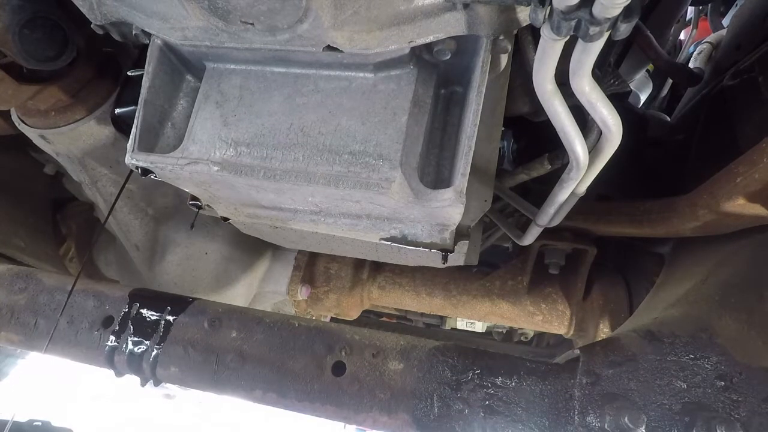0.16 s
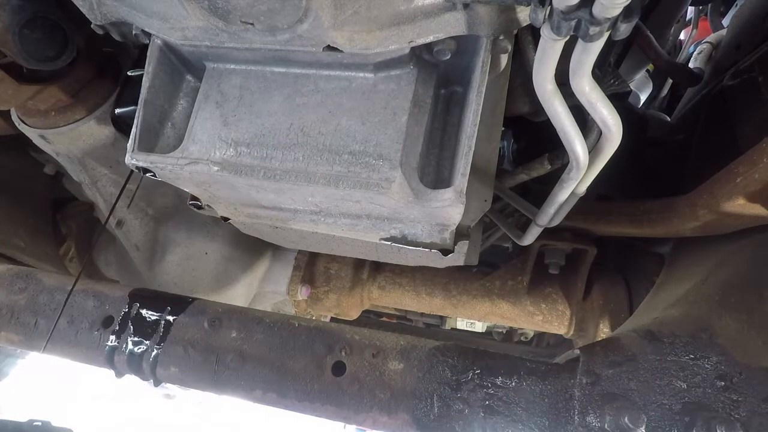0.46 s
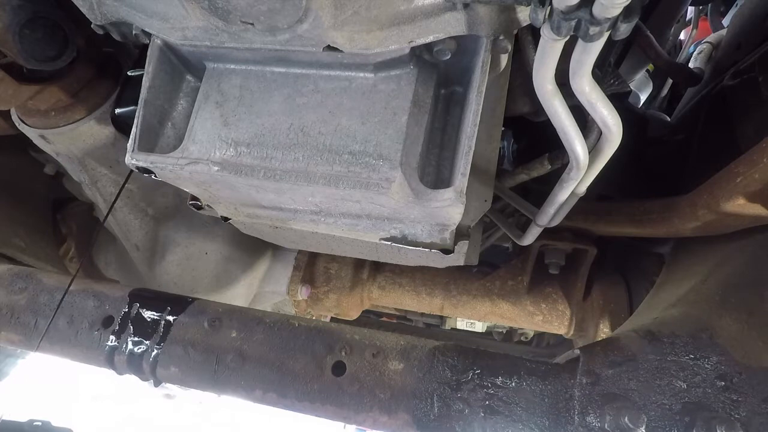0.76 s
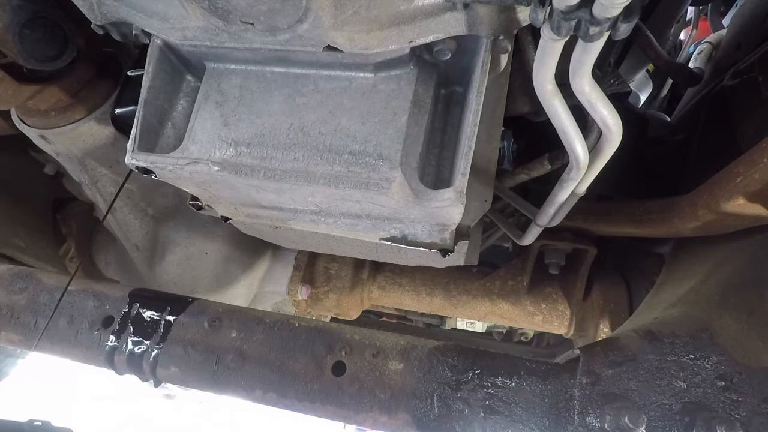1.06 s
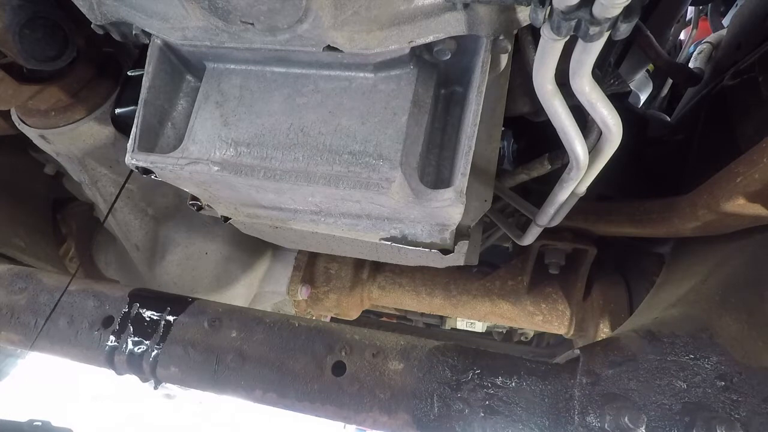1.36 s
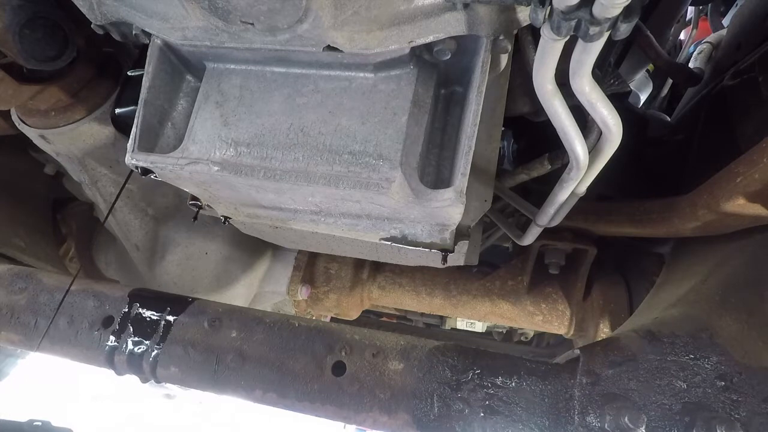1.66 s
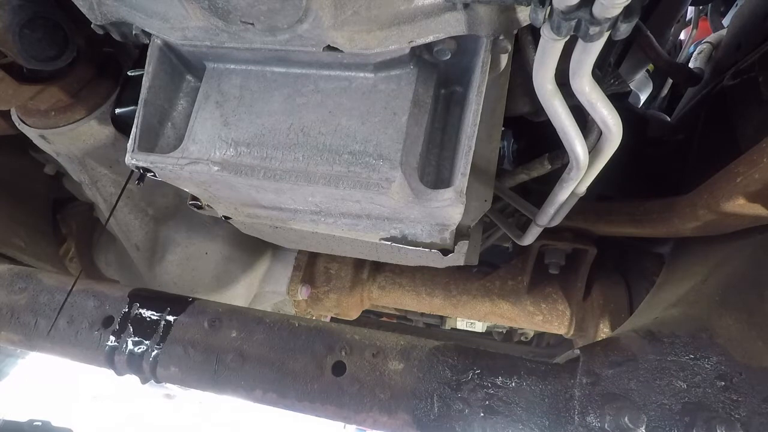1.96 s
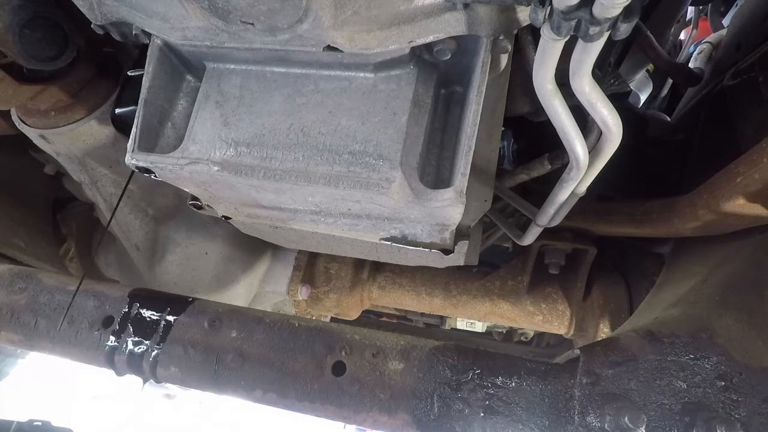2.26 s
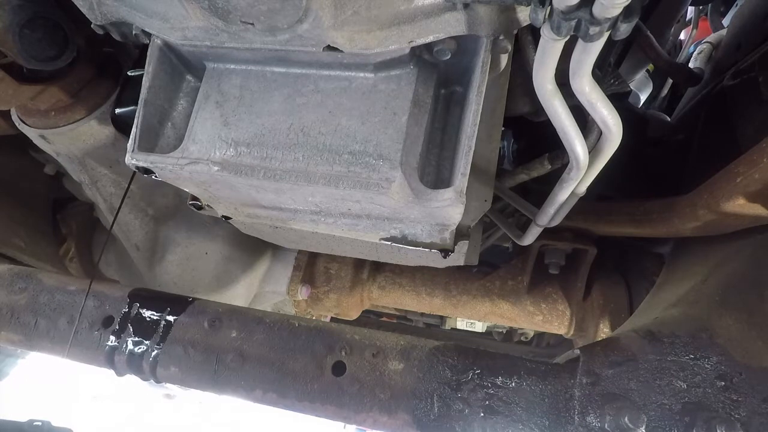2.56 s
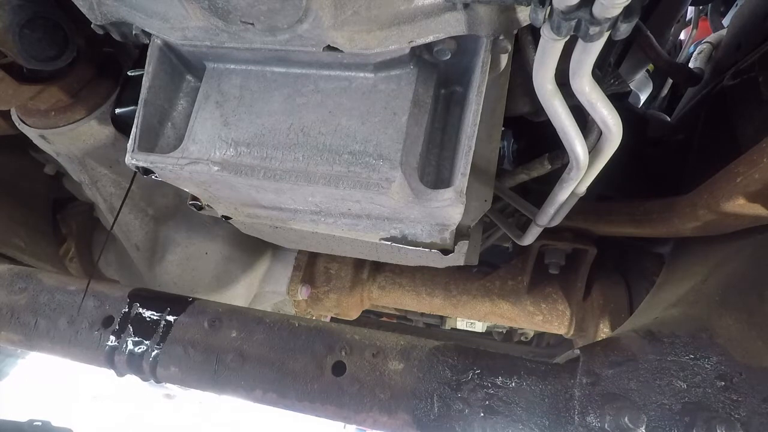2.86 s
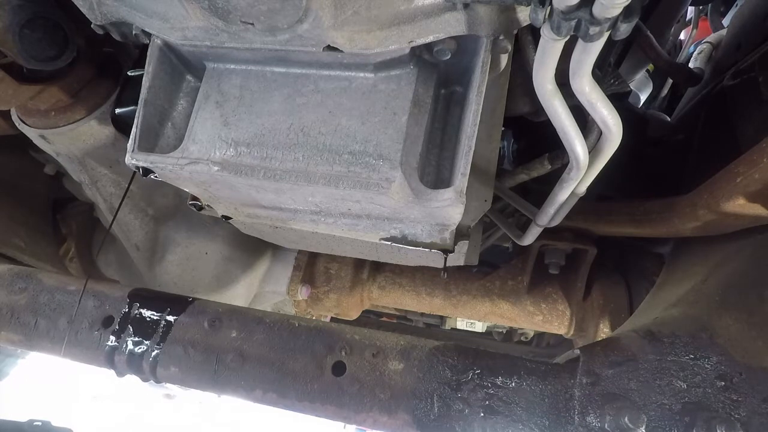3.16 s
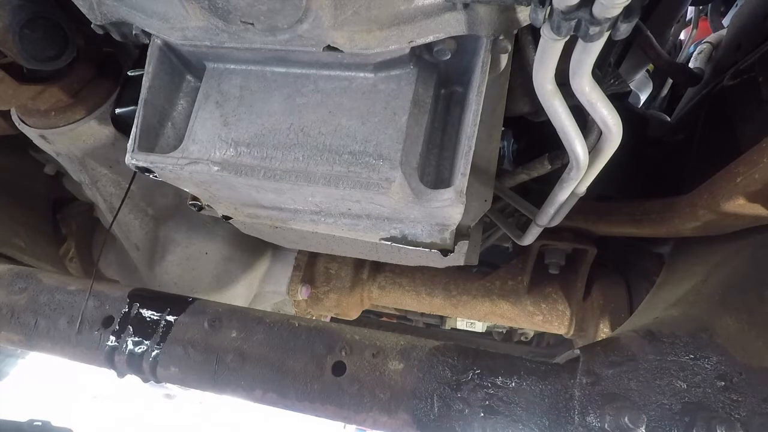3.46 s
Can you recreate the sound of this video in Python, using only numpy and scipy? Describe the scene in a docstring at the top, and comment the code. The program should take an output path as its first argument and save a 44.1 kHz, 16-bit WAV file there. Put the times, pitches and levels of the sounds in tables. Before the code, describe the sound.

Thin oil trickle with irregular plops and crisp tiny pops, close and nearly mono with slight garage echo; it weakens after two seconds, followed by a soft hollow bump and rising wind rumble.

```python
"""A garage: a thin stream of warm oil falls from an engine into a drain pan at the microphone.
Trapped bubbles ring with rising pitch, their film snaps and pops, and the trickle thins out.
Something hollow, probably the pan, is knocked once: a few scuffing contacts ring its decaying tones.
Behind it lie echoes and steady air as filtered noise, then wind noise and sliding hums on the microphone."""
import sys
import numpy as np
from scipy import signal
from scipy.fft import rfft, irfft
from scipy.io import wavfile

SR = 44100
rng = np.random.default_rng(int(sys.argv[2]) if len(sys.argv) > 2 else 0)


def waveform_to_disk(signal):
    """Save audio, clipped to [-1, 1], as 16-bit WAV at the path in sys.argv[1]."""
    frames = np.transpose(np.atleast_2d(signal))
    scaled = np.clip(frames, -1, 1) * 32767
    samples = np.round(scaled).astype(np.int16)
    wavfile.write(sys.argv[1], SR, samples)


N = 158760  # samples in the scene

PLOP_SWELL_MS, PLOP_RISE_OCTAVES, PLOP_ROUGH, PLOP_SNAP_DB = 4.34, 0.25, 0.15, -32.5
TICK_SWELL_MS, TICK_RISE_OCTAVES, TICK_ROUGH, TICK_SNAP_DB = 3.8, 0.13, 0.97, -9.5
TICK_DB, POP_DB = -2.5, 5  # added to the table levels
PLOP_SPRAY_OCTAVES, TICK_SPRAY_OCTAVES = 0.186, 0.268  # pitch scatter of the satellites
POP_DECAY_S, POP_LOWEST_HZ = 0.00068, 7450
GURGLE_DB, GURGLE_PER_S, GURGLE_HZ, GURGLE_OCTAVES = -50.5, 180, 1369, 0.247
BABBLE_DB, BABBLE_PER_S, BABBLE_HZ, BABBLE_OCTAVES = -58.5, 430, 2142, 0.26
FIZZ_DB, FIZZ_PER_S, FIZZ_HZ, FIZZ_OCTAVES = -61.5, 320, 5797, 0.403
SPLASHBACK_DB, SPLASHBACK_T60 = -2, 0.062  # reflections between pan and underbody (t60 in s)

# Large bubbles under the stream [t/s, level/dB, f/Hz at full swell]
PLOPS = [(0.0024, -36.5, 1344), (0.0785, -41, 1404), (0.111, -38.5, 1260), (0.2003, -38, 1970),
         (0.3294, -34, 1613), (0.382, -38.5, 1610), (0.451, -29.5, 1283), (0.4653, -38, 1250),
         (0.4964, -29.5, 1534), (0.5028, -30.5, 1595), (0.5544, -38.5, 1455), (0.596, -33.5, 1310),
         (0.6977, -38, 1460), (0.719, -48, 1800), (0.816, -31.5, 1280), (0.825, -37, 1236),
         (0.836, -28, 1335), (1.036, -36.5, 1380), (1.1543, -33, 1220), (1.212, -43.5, 2545),
         (1.292, -24, 1340), (1.3284, -40, 1290), (1.335, -43, 2420), (1.3454, -32.5, 1540),
         (1.3558, -28.5, 1220), (1.4177, -38.5, 1215), (1.442, -38, 1740), (1.4673, -29.5, 1464),
         (1.6162, -35, 1593), (1.6396, -33, 1406), (1.707, -39.5, 1560), (1.7315, -33, 1920),
         (1.7673, -32, 1340), (1.786, -32, 1343), (1.8156, -35, 967), (1.8395, -26, 1446),
         (1.8715, -26, 1408), (1.925, -38, 1655), (1.9338, -39, 2353), (2.1342, -40, 1490),
         (2.168, -44, 2480), (2.2718, -29, 1362), (2.3203, -34, 1570), (2.6075, -31, 1220),
         (2.649, -45, 2460), (2.728, -39, 2030), (2.7631, -36, 2750), (2.779, -40.5, 1587),
         (2.814, -43, 2820), (2.837, -45, 2450), (2.9999, -42, 2680), (3.0213, -37, 1867),
         (3.062, -50, 2610), (3.188, -47.5, 2690), (3.2034, -38.5, 1540), (3.2173, -40.5, 1404)]
# Small bubbles bursting at the surface [t/s, level/dB before TICK_DB, f/Hz at full swell]
TICKS = [(0.0668, -40, 4990), (0.114, -42.5, 6150), (0.235, -39, 4950), (0.344, -37, 3310),
         (0.3554, -42, 8240), (0.4547, -42, 3980), (0.4945, -43, 3210), (0.55, -42, 3350),
         (0.5618, -44, 4190), (0.6033, -39.5, 4590), (0.713, -37, 8760), (0.7686, -44, 4510),
         (0.8664, -34.5, 4304), (0.94, -40, 6300), (0.984, -46, 4040), (1.0456, -42, 6730),
         (1.115, -43.5, 4350), (1.1614, -42, 5720), (1.209, -37, 7720), (1.2377, -47, 5030),
         (1.2745, -40, 3730), (1.3101, -37, 5850), (1.3851, -40, 6280), (1.435, -40.5, 4300),
         (1.4475, -41, 6780), (1.484, -47, 6700), (1.585, -45, 4910), (1.709, -42, 8200), (1.78, -37, 4470),
         (1.8058, -35, 6310), (2.0354, -38.5, 4215), (2.072, -42.5, 7500), (2.1557, -42, 9400),
         (2.176, -33, 3325), (2.226, -37, 8450), (2.4493, -43.5, 4390), (2.5528, -45.5, 3740),
         (2.6654, -40.5, 4430), (2.7772, -37, 3090), (2.7917, -39.5, 3860), (2.9439, -36.5, 4870),
         (3.1888, -44.5, 8680), (3.29, -49, 7000)]
# Sharp pops of bursting oil film [t/s, level/dB before POP_DB]
POPS = [(0.356, -30.5), (0.902, -37), (0.9522, -36.5), (1.131, -38.5), (1.25, -35.5), (1.3857, -29.5),
        (1.9084, -36), (2.155, -39), (2.3344, -39.5), (2.6203, -37), (3.117, -34.5)]
# Strength of the trickle's faint bubbles [t/s, level/dB]
FLOW = [(0, 1), (1.0, -0.5), (1.9, -2), (2.35, -4), (2.6, -4.5), (3.0, -11.5), (3.6, -37)]
# Air resonances of the pan [f/Hz, width/Hz, level/dB]
CAVITY = [(1315, 45, -3), (2550, 90, -4), (3310, 60, -6), (4600, 80, -6), (6550, 120, -4)]
# How the open pan colours the oil [f/Hz, level/dB]
PAN = [(600, -24), (1000, -2.5), (1300, -5), (1680, -3.5), (1880, -6), (2550, 0.5), (2900, -5.5),
       (3300, 2.5), (6500, -1)]


def trickle():
    """All the bubbles of the stream, thrown back by the underbody and coloured by the pan."""
    oil = np.zeros(N)
    plop_voice = PLOP_SWELL_MS, PLOP_RISE_OCTAVES, PLOP_ROUGH, PLOP_SNAP_DB
    for s, db, hz in PLOPS:
        add(oil, *burst(s, db, hz, PLOP_SPRAY_OCTAVES, *plop_voice))
    tick_voice = TICK_SWELL_MS, TICK_RISE_OCTAVES, TICK_ROUGH, TICK_SNAP_DB
    for s, db, hz in TICKS:
        add(oil, *burst(s, db + TICK_DB, hz, TICK_SPRAY_OCTAVES, *tick_voice))

    t = np.arange(SR // 100) / SR
    for s, db in POPS:
        snap = rng.standard_normal(len(t)) * np.exp(-t / POP_DECAY_S)
        add(oil, s, amp(db + POP_DB) * highpass(snap, POP_LOWEST_HZ))

    gurgle = swarm(GURGLE_PER_S, GURGLE_HZ, GURGLE_OCTAVES, swell_ms=4.88, spread_db=8.5, rough=0.11)
    babble = swarm(BABBLE_PER_S, BABBLE_HZ, BABBLE_OCTAVES, swell_ms=1.7, spread_db=5, rough=0.79)
    fizz = swarm(FIZZ_PER_S, FIZZ_HZ, FIZZ_OCTAVES, swell_ms=1.35, spread_db=14.5, rough=0.73)
    faint = amp(GURGLE_DB) * gurgle + amp(BABBLE_DB) * babble + amp(FIZZ_DB) * fizz
    oil += level(FLOW) * stir() * faint

    oil = oil + amp(SPLASHBACK_DB) * echoes(oil, SPLASHBACK_T60)
    resonance = np.zeros(N)
    for hz, width, db in CAVITY:
        resonance += amp(db) * signal.lfilter(*signal.iirpeak(hz, hz / width, SR), oil)
    return colour(oil + resonance, PAN)


SPRAY_DB, SPRAY_S = -10, 0.0075  # satellites: level against the main bubble, mean and spread of delay
LEAD_SHARE = 0.4285  # part of its swell that a bubble has behind it when it is first noticed


def burst(s, db, hz, spray_octaves, swell_ms, *voice):
    """One bubble inside a cluster of smaller satellites, some just before it and more after."""
    out = np.zeros(SR // 6)
    middle_s = 0.06  # room for early satellites
    add(out, middle_s - LEAD_SHARE * swell_ms / 1000, bubble(hz, swell_ms, *voice))
    for wait, size in rng.standard_normal((4, 2)):
        ratio = 2 ** (spray_octaves * (size + wait / 2 + 0.5))
        satellite = bubble(hz * ratio, swell_ms / 2, *voice)
        add(out, middle_s + SPRAY_S * (wait + 1), amp(SPRAY_DB) * satellite)
    cut = max(round((middle_s - s) * SR), 0)  # whatever would precede the start
    return max(s - middle_s, 0), amp(db) * out[cut:]


SPLASH_WIDTH = 0.27  # bandwidth of a splash as a share of its pitch


def bubble(hz, swell_ms, rise_octaves, rough, snap_db):
    """A bubble swells and rings, rising as it nears the surface; splashing blurs it, its film snaps."""
    t = np.arange(SR // 25) / SR
    u = 1000 * t / max(swell_ms, 0.2)  # 1 at full swell
    pitch = np.minimum(hz * 2 ** (rise_octaves * np.tanh((u - 1) / 2)), SR / 2)
    phase = 2 * np.pi * (np.cumsum(pitch) / SR + rng.random())

    a, b, film = rng.standard_normal((3, len(t)))
    r = np.exp(-np.pi * SPLASH_WIDTH * hz / SR)
    a, b = unit(signal.lfilter([1], [1, -2 * r, r * r], [a, b]))  # slow random wobble
    share = np.clip(rough, 0, 1)
    blur = np.sqrt(1 - share) + np.sqrt(share / 2) * (a + 1j * b)
    note = (blur * np.exp(1j * phase)).real

    swell = (u * np.exp(1 - u)) ** 2
    snap = (2 * u * np.exp(1 - 2 * u)) ** 2 * np.gradient(film)
    return swell * note + amp(snap_db) * snap


def swarm(per_s, hz, octaves, swell_ms, spread_db, rough):
    """Countless faint bubbles of random size, 60 voices each used at up to 40 random times."""
    out = np.zeros(N)
    chance = per_s * N / SR / (60 * 40)
    for size in rng.standard_normal(60):
        ring = bubble(hz * 2 ** (octaves * size), swell_ms, PLOP_RISE_OCTAVES, rough, PLOP_SNAP_DB)
        for when, keep, strength in rng.random((40, 3)):
            if keep < chance:
                add(out, when * N / SR, amp(spread_db * strength ** 2) * ring)
    return unit(out)


STIR_S, STIR_LAG_S, CALM_DB = 0.019, 0.0072, -7  # CALM_DB is the strength in the lulls


def stir():
    """How strongly the oil is churned over time: most just after each strong bubble."""
    t = np.arange(N) / SR
    churn = sum(np.exp(-((t - s - STIR_LAG_S) / STIR_S) ** 2) for s, _, _ in PLOPS + TICKS)
    return amp(CALM_DB) + np.tanh(churn)


HISS_HZ, HISS_WIDTH_HZ = 8480, 1200
# Fine froth where the stream lands [t/s, level/dB]
HISS_LEVEL = [(1.9, -68), (2.35, -62.5), (2.75, -69.5)]


def froth():
    """A faint hiss where the stream lands: noise through a narrow resonance."""
    band = signal.iirpeak(HISS_HZ, HISS_HZ / HISS_WIDTH_HZ, SR)
    hiss = unit(signal.lfilter(*band, rng.standard_normal(N)))
    return hiss * level(HISS_LEVEL)


KNOCK_DB, KNOCK_RISE_S, SCUFF_DB, SCUFF_DECAY_S = -24, 0.00045, -28, 0.018
# Contacts of the knock [t/s, level/dB]
KNOCKS = [(2.619, -10), (2.629, -1), (2.6425, -4.5), (2.655, -7.5), (2.727, -18.5)]
# What the hollow body rings with [f/Hz, level/dB, t60/s]
BODY = [(157.6, -8.5, 0.3), (236.4, 6.5, 0.094), (363.9, -6.5, 0.43), (472, -10, 0.24), (558.6, -9, 0.39),
        (583, -9.5, 0.27), (843, -10.5, 0.33), (905, -12, 0.24), (935, -21, .26), (1038, -19.5, 0.23),
        (1540, -12.5, 0.09)]
# Colour of the scuffing [f/Hz, level/dB per Hz]
SCUFF = [(130, -25), (240, 5), (500, 4.5), (740, 1), (1000, -1), (1700, -6), (3000, -20.5), (8000, -84)]


def knock():
    """A few soft, scuffing contacts in quick succession ring the decaying modes of a hollow body."""
    out = np.zeros(N)
    t = np.arange(SR // 2) / SR
    ring = sum(amp(db - 60 * t / t60) * np.sin(2 * np.pi * hz * t) for hz, db, t60 in BODY)
    onset = 1 - np.exp(-t / KNOCK_RISE_S)
    for s, db in KNOCKS:
        scuff = amp(SCUFF_DB) * noise(SCUFF)[:len(t)] * np.exp(-t / SCUFF_DECAY_S)
        add(out, s, amp(db) * onset * (amp(KNOCK_DB) * ring + scuff))
    return out


# Colour of the low draught [f/Hz, level/dB per Hz]
DRAUGHT = [(20, -9), (100, -51), (140, 0.5), (165, 5), (230, -2), (330, -14), (1500, -54)]
# Course of the draught [t/s, level/dB]
DRAUGHT_LEVEL = [(0, -71), (2.2, -58), (2.55, -45.5), (2.85, -40.5), (2.94, -39), (3.25, -45), (3.6, -39.5)]
# Colour of the gusts on the microphone [f/Hz, level/dB per Hz]
BUFFET = [(10, -21), (25, 0), (38, -2), (60, -9), (100, -10), (160, -15.5), (300, -27.5), (1200, -59.5)]
# Course of the gusts [t/s, level/dB]
BUFFET_LEVEL = [(2.1, -86), (2.8, -60.5), (2.96, -45), (3.16, -40.5), (3.32, -33.5), (3.49, -33.5),
                (3.6, -24)]
# Eddies that hum and thump at the microphone
# [middle t/s, half length/s, level/dB, f/Hz at the middle, glide/octaves per s]
EDDIES = [(2.815, 0.029, -31.5, 156, -1.5), (2.988, 0.025, -35, 166, 0.5), (3.085, 0.07, -42.5, 220, -2.6),
          (3.225, .045, -37.5, 151, -5), (3.495, 0.02, -21, 31, -3.5)]


def wind():
    """Low noise swells as draught and gusts at the microphone; eddies hum with sliding pitch."""
    out = noise(DRAUGHT) * level(DRAUGHT_LEVEL) + noise(BUFFET) * level(BUFFET_LEVEL)
    t = np.arange(-SR // 5, SR // 5) / SR
    for s, half_s, db, hz, glide in EDDIES:
        turns = np.cumsum(hz * 2 ** (glide * t)) / SR + rng.random()
        hum = np.exp(-(t / half_s) ** 2) * np.sin(2 * np.pi * turns)
        add(out, s + t[0], amp(db) * hum)
    return out


AIR_DB = -49
# Steady air of the garage [f/Hz, level/dB per Hz]
AIR = [(20, -37), (90, -26.5), (112, -33), (140, 0), (180, 1), (250, -3), (400, -9), (800, -15.5),
       (3000, -25.5), (6000, -27.5), (8700, -29.5), (11500, -29), (15000, -23)]


def still_air():
    """The steady air of the garage, as coloured noise."""
    return amp(AIR_DB) * noise(AIR)


def echoes(x, t60):
    """Dense reflections of random sign that die away, of energy 1."""
    t = np.arange(SR // 2) / SR
    present = (rng.random(len(t)) < 0.1) * (t > 0.001)
    taps = rng.choice([-1., 1.], len(t)) * present * amp(-60 * t / t60)
    return signal.fftconvolve(x, taps / np.linalg.norm(taps))[:N]


def amp(db):
    """Decibels to gain."""
    return 10 ** (np.asarray(db) / 20)


def unit(x):
    """Scales to rms 1."""
    return x / np.sqrt(np.mean(x ** 2) + 1e-20)


def level(points):
    """Gain over time from (t/s, level/dB) points."""
    return amp(np.interp(np.arange(N) / SR, *np.transpose(points)))


def add(mix, s, sound):
    """Mixes a sound in at a time in seconds."""
    part = mix[max(round(s * SR), 0):][:len(sound)]
    part += sound[:len(part)]


def noise(spectrum):
    """Noise of rms 1 with the given (f/Hz, level/dB) colour."""
    return unit(colour(rng.standard_normal(N), spectrum))


def colour(x, spectrum):
    """Filters by (f/Hz, level/dB) points, joined along log frequency."""
    hz, db = np.transpose(spectrum)
    bins = np.fft.rfftfreq(2 * N, 1 / SR)
    gain = amp(np.interp(np.log(bins + 1), np.log(hz), db))
    return irfft(rfft(x, 2 * N) * gain)[..., :N]


def highpass(x, hz, order=2):
    """Weakens what lies below hz."""
    sos = signal.butter(order, min(hz, 0.45 * SR), "high", fs=SR, output="sos")
    return signal.sosfilt(sos, x)


GARAGE_DB, GARAGE_T60 = -17.5, 0.35  # echo level against the near sounds, t60 in s
WIDE_HZ = 13000  # the channels differ mostly above this


def scene():
    """Oil and knock near the microphone in the garage, over still air and wind; nearly mono."""
    near = trickle() + froth() + highpass(knock(), hz=134, order=6)
    mid = near + amp(GARAGE_DB) * echoes(near, GARAGE_T60) + still_air() + wind()
    scatter = echoes(mid, SPLASHBACK_T60)
    side = highpass(scatter, WIDE_HZ, order=8)
    return np.array([mid + side, mid - side])


EDGE_HZ = 15450  # upper band limit


def record(dry):
    """The microphone dulls the top octave; then the band limit."""
    dull = colour(dry, [(9000, 0.5), (11500, -4.5), (15000, -18.5)])
    lowpass = signal.firwin(511, EDGE_HZ, window=("kaiser", 9), fs=SR)
    return signal.oaconvolve(dull, lowpass[None], "same")


dry = scene()
out = record(dry)
waveform_to_disk(out)
```